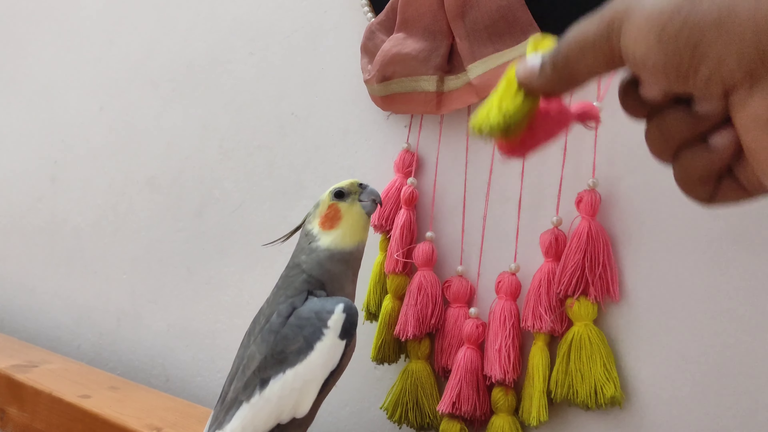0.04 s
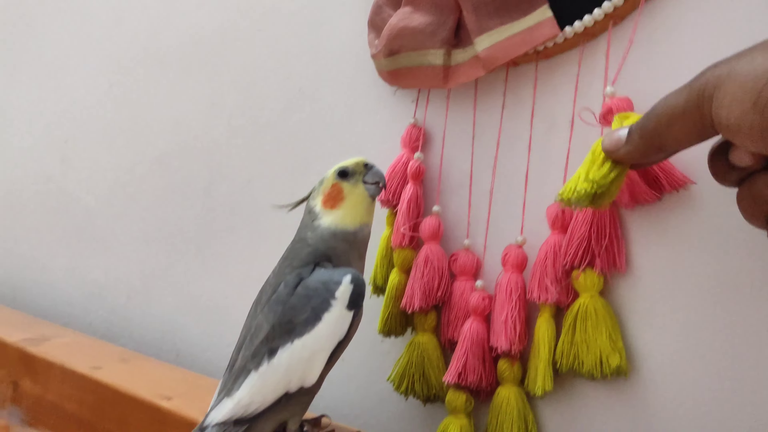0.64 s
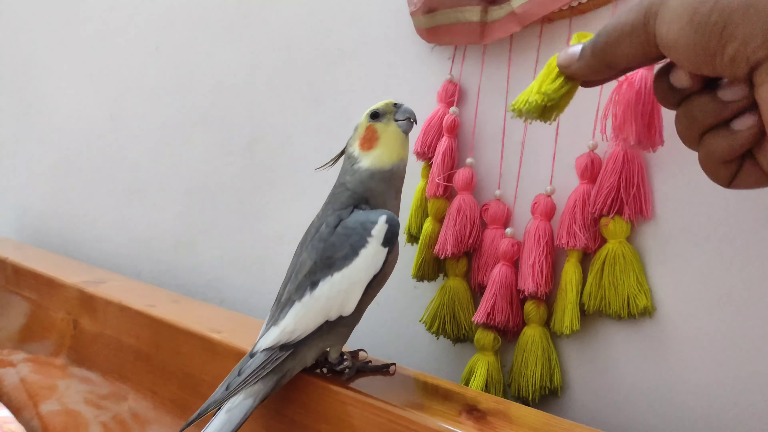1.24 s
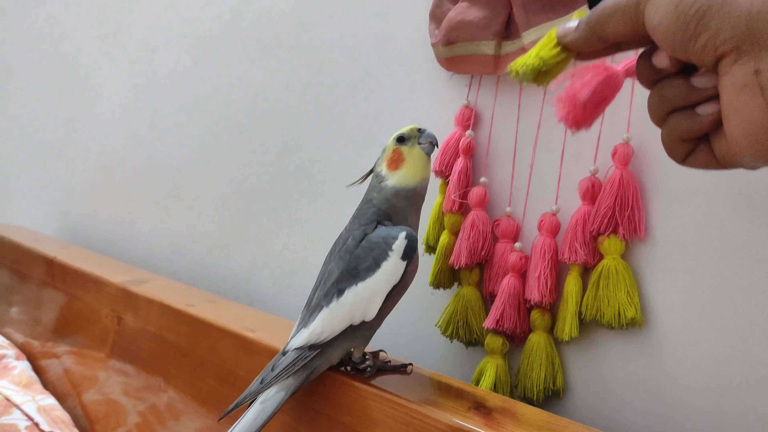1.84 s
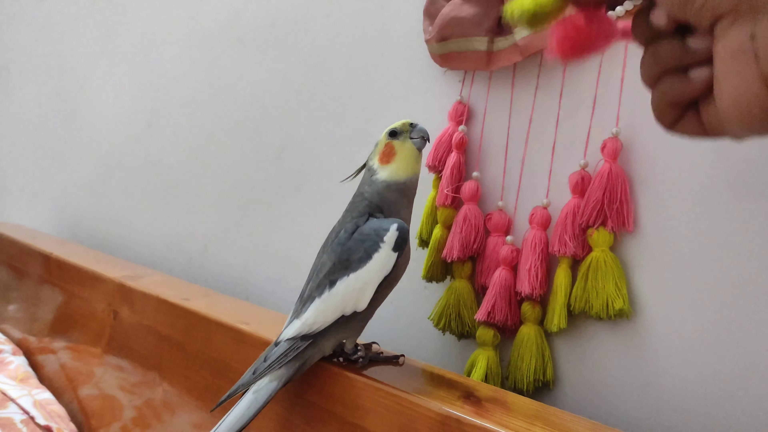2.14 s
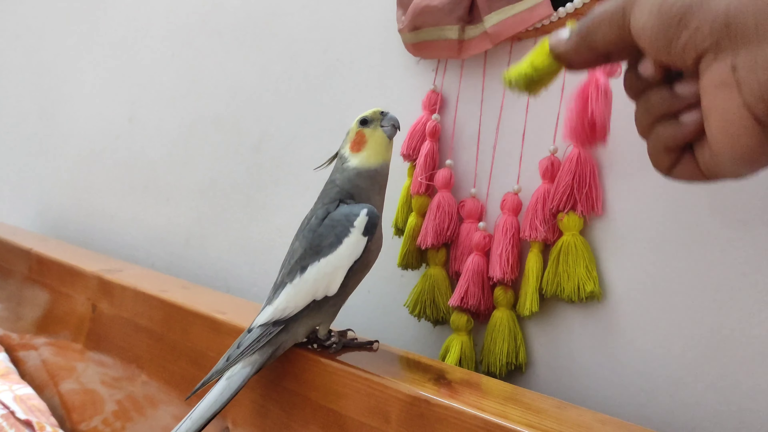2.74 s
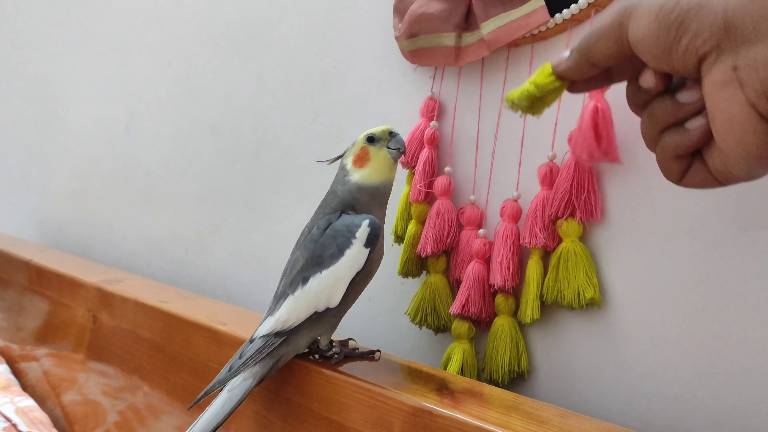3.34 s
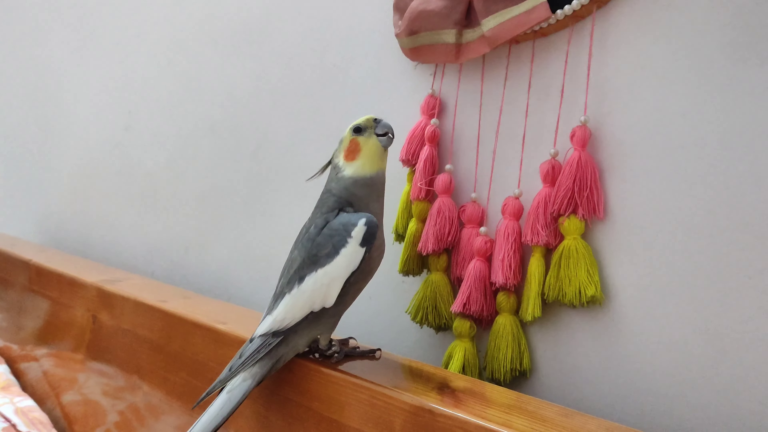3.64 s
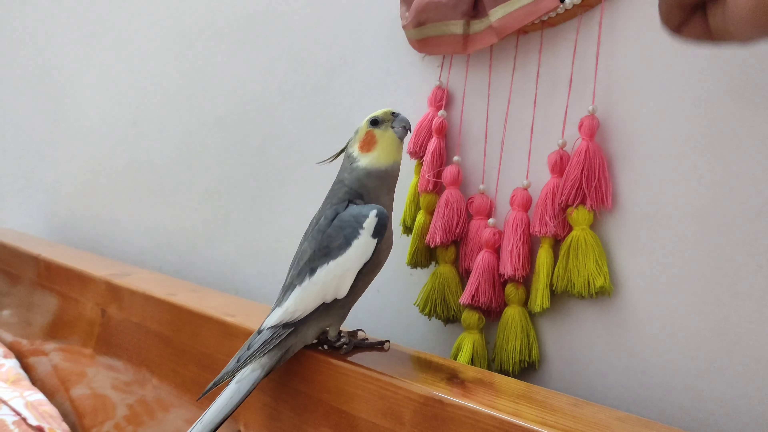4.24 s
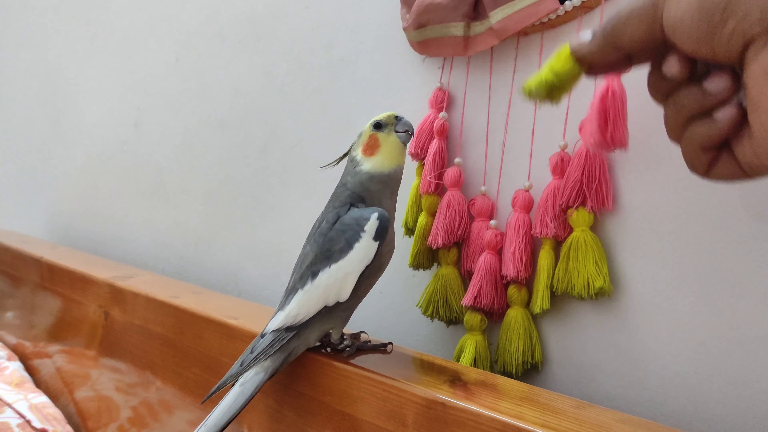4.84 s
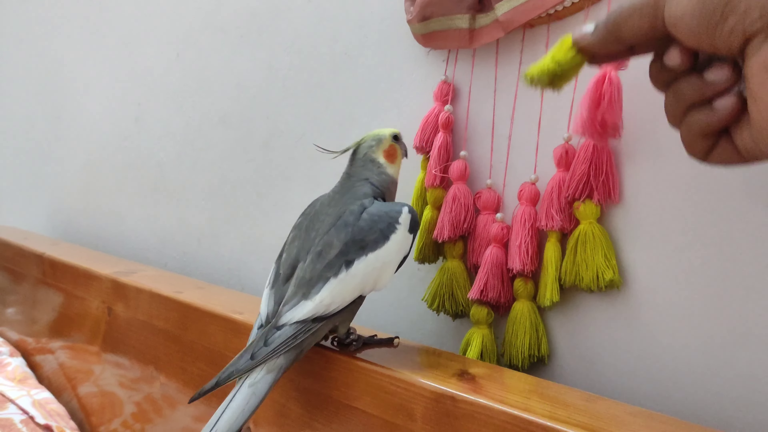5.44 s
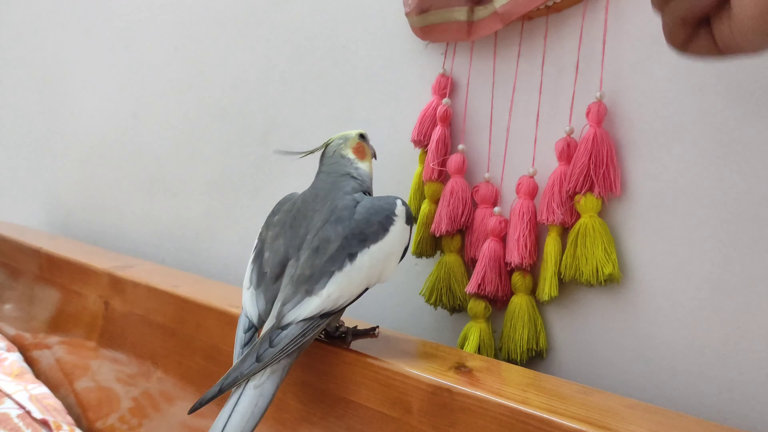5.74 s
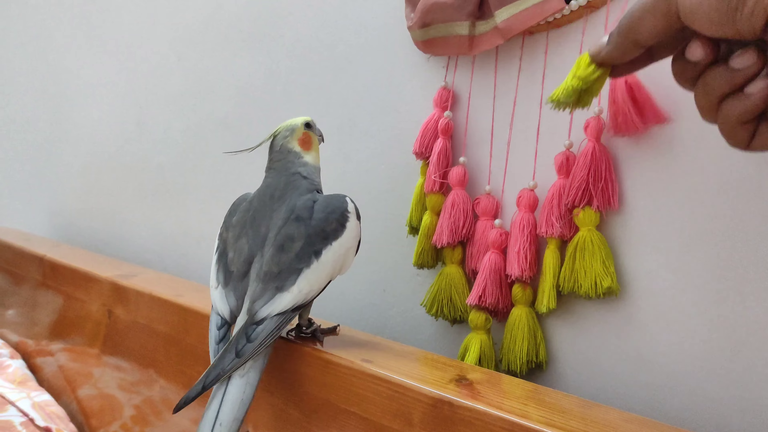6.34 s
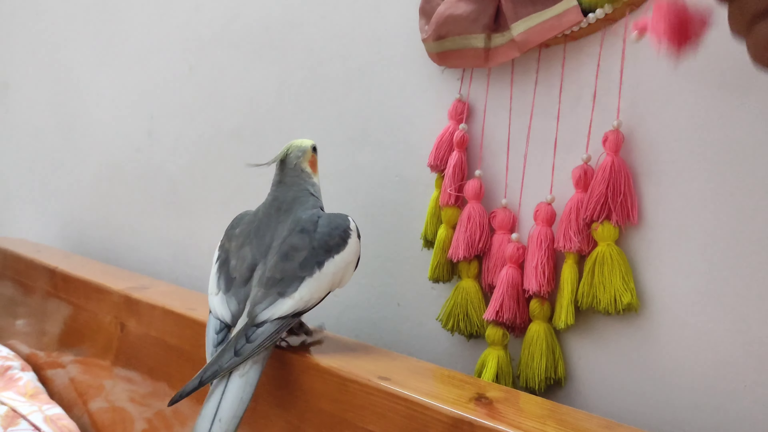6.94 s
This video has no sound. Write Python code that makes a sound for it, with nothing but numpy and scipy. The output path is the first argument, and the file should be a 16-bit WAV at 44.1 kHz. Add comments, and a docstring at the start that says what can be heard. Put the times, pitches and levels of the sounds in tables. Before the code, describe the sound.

A cockatiel sings close by in a small room, with whistles, quick chirps, warbled glides and a repeated nasal tune.

```python
"""A cockatiel sings close by in a small room while a hand jiggles the tassels of a wall hanging.
Its voice box opens with two whistles, a cluck and a warbled arch, then six quick chirps follow.
Midway a nasal tune comes four times, with one dull bump on wood as it starts. Two clucks, each with a
warbled glide, lead to the last chirps and rasps. All along, the room rumbles and rings softly,
with a thin hiss and a few faint ticks."""
import sys
import numpy as np
from scipy import signal
from scipy.fft import rfft, irfft
from scipy.io import wavfile

SR = 44100
rng = np.random.default_rng(int(sys.argv[2]) if len(sys.argv) > 2 else 0)


def store_wav(level_fs):
    """Save 16-bit WAV to argv[1]."""
    pcm = np.round(np.clip(np.atleast_2d(level_fs), -1, 1) * 32767)
    wavfile.write(sys.argv[1], SR, pcm.T.astype(np.int16))


N = 317961
TIME = np.arange(N) / SR

# tone colours of the voice: level/dB of harmonics 2 to 5, added to a syllable's overtone level
PURE, HOLLOW = [-1, -8.5, -23, -20], [6.5, 6.5, -9, -32.5]
BRIGHT, REEDY = [-4.5, 9.5, 8, -6.5], [0.5, -14, -25, -27.5]


def cockatiel():
    """The bird strings syllables together; all of them leave through the same throat."""
    # how each syllable is sung: settings for syllable(); triples give the onset, hold and end values
    syllables = { "rise": dict(colour=PURE, attack_s=.036, hold_s=.02, level_db=(-41.5, -22.5, -36),
                 overtones_db=(-17.5, -18.5, -19), rasp=(.07, .05, 0.089)),
                 "whistle": dict(colour=HOLLOW, attack_s=.062, hold_s=.011, level_db=(-40.5, -16.5, -30),
                 overtones_db=(-34, -34.5, -27), rasp=(.06, .012, .005), swell=1.2),
                 "cluck": dict(colour=BRIGHT, attack_s=0.011, hold_s=.004, level_db=(-35, -36, -40),
                 overtones_db=(15, 0, -0.5), rasp=(0.047, 0.052, 1)),
                 "arch": dict(colour=PURE, attack_s=.064, hold_s=0.033, level_db=(-36, -17.5, -31.5),
                 overtones_db=(-32, -25, -15.5),
                 warble=.049, falter_s=.105, falter_db=-12.5, break_s=0.14, rasp=(.1, .035, .45)),
                 "slow arch": dict(colour=PURE, attack_s=0.078, hold_s=.028, level_db=(-41.5, -21, -32),
                 overtones_db=(-19, -22, -12),
                 warble=.055, swell=1.6, falter_s=.076, falter_db=-13.5, break_s=.145, rasp=(.12, .045, .5)),
                 "slur": dict(colour=PURE, attack_s=0.069, hold_s=0.018, level_db=(-44, -27, -31.5),
                 overtones_db=(-29, -8.5, -33), rasp=(.1, 0.013, .01), warble=0.044),
                 "chip": dict(colour=PURE, attack_s=0.025, hold_s=.011, level_db=(-44.5, -23, -36),
                 overtones_db=(-7, -25.5, -28), rasp=(.6, 0.071, 0.085), swell=1.5),
                 "slide": dict(colour=PURE, attack_s=.01, hold_s=0.01, level_db=(-37, -51.5, -37.5),
                 overtones_db=(-29.5, -36.5, -26), rasp=(.1, .2, .6)),
                 "squeak": dict(colour=PURE, attack_s=.004, hold_s=.004, level_db=(-44.5, -39, -45.5),
                 overtones_db=(-36, -31.5, -21.5), rasp=(.1, .15, .9)),
                 "flick": dict(colour=PURE, attack_s=0.0045, hold_s=.009, level_db=(-48.5, -31.5, -49.5),
                 overtones_db=(-18.5, -18, -18), rasp=(.6, .3, 0.94), swell=2),
                 "nasal": dict(colour=REEDY, attack_s=.04, hold_s=0.002, level_db=(-56.5, -33, -41.5),
                 overtones_db=(19.5, 4.5, -27), rasp=(0.11, 0.015, .04)),
                 "blip": dict(colour=PURE, attack_s=0.015, hold_s=0.0021, level_db=(-52.5, -33.5, -34),
                 overtones_db=(-14, -21.5, -33), rasp=(1, 0.4, .2), swell=2),
                 "fall": dict(colour=PURE, attack_s=0.014, hold_s=0.015, level_db=(-50, -33.5, -40),
                 overtones_db=(-41, -22, -14.5), rasp=(0.91, 0.1, 1), warble=0.019),
                 "hoot": dict(colour=PURE, attack_s=.005, hold_s=0.0072, level_db=(-35, -33, -47.5),
                 overtones_db=(-13.5, -25, -13), rasp=(.3, .03, .15)),
                 "rasp": dict(colour=PURE, attack_s=0.033, hold_s=.004, level_db=(-41.5, -31.5, -49),
                 overtones_db=(-22.5, -46.5, -15.5), rasp=(.55, .9, 1), warble=.12)}
    # the path of each syllable's pitch: t/s from its start, f/Hz
    glides = { "rise": [(0, 2150), (.014, 2275), (.026, 2620), (.042, 2930), (.066, 3150), (.08, 3090)],
              "whistle": [(0, 2250), (.035, 2360), (.054, 2314), (.066, 2220), (.094, 2210)],
              "cluck": [(0, 1485), (.009, 1499), (.016, 1571), (.034, 1518)], "arch": [(0, 1560),
              (.02, 2046), (.048, 2183), (.064, 2882), (.084, 2973), (.104, 3256), (.118, 2720),
              (.127, 1932), (.172, 1561)], "slow arch": [(0, 1354), (.035, 1940), (.073, 2040),
              (.085, 2790), (.115, 3114), (.14, 2780), (.158, 1870), (.175, 1632), (.208, 1706)],
              "slur": [(0, 1225), (.026, 1920), (.04, 2015), (.07, 1915), (.095, 2005), (.127, 1935)],
              "chip": [(0, 1261), (.016, 1460), (.026, 2487), (.036, 2714), (.046, 2756), (.062, 2638)],
              "slide": [(0, 4200), (.014, 3610), (.024, 2746), (.031, 2250), (.04, 1930)],
              "squeak": [(0, 4600), (.011, 4425), (.02, 3500)], "flick": [(0, 3510), (.005, 2562),
              (.027, 1950)], "nasal": [(0, 1262), (.013, 1277), (.026, 1332), (.043, 1425), (.062, 1406)],
              "blip": [(0, 1565), (.016, 2185), (.023, 2390)], "fall": [(0, 4853), (.004, 4486),
              (.007, 2986), (.011, 2656), (.029, 2171), (.04, 1697), (.054, 1460)], "hoot": [(0, 1450),
              (.008, 1509), (.017, 1396), (.026, 1390)], "rasp": [(0, 1620), (.065, 1796)]}
    # windpipe and beak favour the sound below 3 kHz and weaken it above: f/Hz, level/dB
    throat = [(500, 4), (1400, -3), (2900, 2), (3300, -5), (3700, -6), (4600, -14.5), (5400, -11.5),
              (6200, -5.5), (7400, -8)]
    out = np.zeros(N)
    for s, name, ratio, strength_db in song():
        add(out, s, from_db(strength_db) * syllable(ratio, glides[name], **syllables[name]))
    return coloured(out, throat)


def song():
    """Spell the song out as a list of syllables: t/s, name, pitch ratio, strength/dB."""
    # single notes: t/s, syllable, pitch ratio, strength/dB
    lone_notes = [(.029, "rise", 1, -0.5), (.211, "whistle", 1, -1), (1.758, "rasp", .96, -13),
                  (6.89, "rasp", .84, -10), (7.028, "rasp", 1.39, -1.5)]
    # a cluck, then a warbled glide: t/s, cluck pitch ratio, cluck strength/dB, glide delay/s, glide
    flourishes = [(.568, 1, 1, 0.14, "arch"), (5.201, 1.025, 3, 0.14, "slur"),
                  (5.726, 1.022, 1, 0.13, "slow arch")]
    # a rising chip, then a falling tail: t/s, pitch ratio, strength/dB, delay/s, tail, tail pitch ratio
    chirps = [(.984, .975, 1.5, .105, "soft", 0.92), (1.244, .99, 1.5, 0.11, "soft", 0.9),
              (1.806, 1.045, 7, 0.11, "sharp", 0.91), (2.077, 1.01, 0.5, 0.11, "sharp", 0.91),
              (2.355, 1.015, 1.5, 0.11, "sharp", 0.93), (2.635, 1.01, 0.5, 0.12, "sharp", 0.97),
              (6.16, 1.005, 1.5, .112, "soft", 0.87), (6.426, 1, 0.5, 0.12, "soft", .86),
              (6.942, 1.037, 4.5, 0.11, "sharp", 1.015)]
    # the soft and the sharp tail: delay/s, syllable
    tails = {"soft": [(0.0018, "slide")], "sharp": [(0, "squeak"), (.015, "flick")]}
    # the nasal tune: delay/s, syllable
    tune = [(0, "nasal"), (.097, "blip"), (.171, "fall"), (0.225, "hoot")]
    # it comes four times, slowing a little: t/s, pitch ratio, strength/dB
    tune_repeats = [(3.413, 0.99, -.5), (3.842, 0.99, 0.5), (4.28, 1.003, -.3), (4.731, 1, .8)]
    notes = list(lone_notes)
    for s, ratio, strength_db, delay, glide in flourishes:
        notes += [(s, "cluck", ratio, strength_db), (s + delay, glide, 1, 0)]
    for s, ratio, strength_db, tail_delay, tail, tail_ratio in chirps:
        notes += [(s, "chip", ratio, strength_db)]
        notes += [(s + tail_delay + delay, name, tail_ratio, 0) for delay, name in tails[tail]]
    for s, ratio, strength_db in tune_repeats:
        notes += [(s + delay, name, ratio, strength_db) for delay, name in tune]
    return notes


def syllable(ratio, glide, colour, attack_s, hold_s, level_db, overtones_db, rasp,
             warble=.003, swell=1, falter_s=0, falter_db=0, break_s=None):
    """The voice box (syrinx) vibrates in a tone with overtones, and rasps when it shakes unevenly."""
    warble_hz, shake_hz = 112, 540
    falter_width_s, break_length_s, fade_s = .005, .0088, .0051
    length_s, release_s = glide[-1][0], attack_s + hold_s
    t = np.arange(int(length_s * SR)) / SR
    # three stages: attack, hold, release; a swell above 1 delays the attack, then hurries it
    stage_times = [0, attack_s, release_s, length_s]
    stage = np.where(t < attack_s, attack_s * (t / attack_s) ** swell, t)
    level_db, overtones_db = [np.interp(stage, stage_times, [onset, hold, hold, end])
                              for onset, hold, end in (level_db, overtones_db)]
    # a falter is a brief dip as the voice changes register (its low or high range)
    level_db = level_db + falter_db * np.exp(-((t - falter_s) / falter_width_s) ** 2)
    # the rasp settles during the attack and jumps to its end value on release, or later at break_s
    break_s = break_s or release_s
    onset, hold, end = rasp
    rasp = np.interp(t, [0, attack_s, break_s, break_s + break_length_s], [onset, hold, hold, end])
    # the pitch wanders, trembles and warbles, each by a small share of itself
    unsteady = .008 * flutter(hz=45, size=len(t)) + .0058 * flutter(hz=250, size=len(t))
    warbling = warble * np.sin(2 * np.pi * warble_hz * t)
    hz = np.interp(t, *np.transpose(glide)) * ratio * (1 + warbling + unsteady)
    phase = 2 * np.pi * np.cumsum(hz) / SR
    # when every second cycle differs (period doubling), tones appear halfway between the harmonics
    doubling = .34 * np.cos(phase / 2)
    gains = [1] + [from_db(overtones_db + db) for db in colour]
    tone = 0
    for k, gain in enumerate(gains, 1):
        # uneven cycles smear each harmonic, the higher ones sooner
        shake = (flutter(shake_hz, len(t)) + 1j * flutter(shake_hz, len(t))) / 2
        rough = np.minimum(rasp * k ** .49, 1)
        swing = np.sqrt(1 - rough ** 2) + rough * (shake + doubling)
        harmonic = np.imag(swing * np.exp(1j * k * phase))
        tone = tone + gain * (k * hz < SR / 2) * harmonic
    # the vibration needs a few cycles to start and to stop
    from_edge_s = np.minimum(t, t[-1] - t)
    fade = np.sin(np.pi / 2 * np.clip(from_edge_s / fade_s, 0, 1)) ** 2
    return from_db(level_db) * fade * tone


def bump(start_s=3.497, contact_s=0.0027):
    """A soft blow on wood sets a few low tones ringing briefly."""
    # the wood's own tones: f/Hz, level/dB, time/s to fade by 60 dB
    wood_tones = [(108.8, -33.5, 0.26), (142.3, -17.5, 0.059), (226, -40, 0.12), (304, -30, 0.077),
                  (414, -39.5, 0.1), (860, -14.5, 0.0087)]
    out, t = np.zeros(N), TIME[:SR // 2]
    ring = sum(from_db(db - 60 * t / t60) * np.sin(2 * np.pi * hz * t) for hz, db, t60 in wood_tones)
    add(out, start_s, ring * (1 - np.exp(-t / contact_s)))
    return out


def ticks(fade_s=0.024):
    """Tiny dry contacts make bursts of noise that die at once."""
    # the contacts: t/s, level/dB
    contacts = [(0.502, -57), (2.889, -46), (3.155, -46), (5.718, -36.5), (6.68, -50), (7.122, -38.5)]
    # tone colour of a tick: f/Hz, level/dB
    tick_colour = [(300, -4), (900, 16), (2200, 5), (5000, -15.5), (7400, 2.5)]
    out, t = np.zeros(N), TIME[:SR // 10]
    for s, level_db in contacts:
        add(out, s, noise(tick_colour, len(t)) * from_db(level_db - 60 * t / fade_s))
    return out


def room(sound, build_s=0.0031, fade_s=0.29, tail_db=-7):
    """Sound arrives directly, as a few near echoes, and as a blurred tail that builds and dies away."""
    # echoes from wall and furniture: delay/s, gain
    echoes = [(.0013, 0.12), (.0062, 0.29), (0.0122, 0.28)]
    # tone colour of the tail: f/Hz, level/dB
    tail_colour = [(200, 8.5), (2500, -3), (7000, -3.5)]
    t = TIME[:SR * 3 // 4]
    tail = noise(tail_colour, len(t)) * from_db(-60 * t / fade_s) * (1 - np.exp(-t / build_s))
    response = from_db(tail_db) * tail / np.sqrt(np.sum(tail ** 2))
    response[0] += 1   # the direct sound
    for delay, gain in echoes:
        response[round(delay * SR)] += gain
    return signal.fftconvolve(sound, response)[:N]


def background(rumble_db=-44, hiss_lift_db=2.0):
    """The room rumbles steadily, with a hum near 100 Hz; a thin high hiss swells and fades on top."""
    # tone colour of the rumble: f/Hz, level/dB
    rumble_colour = [(25, -52.5), (45, -17), (62, -7), (80, -18), (100, 3.5), (125, -8.5), (200, -7),
                     (240, -13.5), (480, -26.5), (750, -25.5), (1100, -37.5), (2600, -49), (4500, -62.5),
                     (7500, -61)]
    # the hiss over time, before its lift: t/s, level/dB
    hiss_levels = [(0.0, -84.5), (0.74, -75.5), (1.18, -78), (1.46, -87.5), (1.8, -89), (2.0, -79.5),
                   (3.57, -84), (5.77, -86), (5.9, -79), (6.13, -74.5), (6.28, -82), (6.96, -83),
                   (7.2, -72.5)]
    # tone colour of the hiss: f/Hz, level/dB
    hiss_colour = [(3000, -26.5), (5500, -10.5), (6800, 2), (7500, 8), (7800, -19)]
    hiss_db = np.interp(TIME, *np.transpose(hiss_levels)) + hiss_lift_db
    hiss = from_db(hiss_db) * noise(hiss_colour, N)
    return from_db(rumble_db) * noise(rumble_colour, N) + hiss


def from_db(db):
    """Turn decibels into a gain to multiply by."""
    return 10 ** (np.asarray(db) / 20)


def rms_one(x):
    """Scale a signal so that its average size (rms) is 1."""
    return x / np.sqrt(np.mean(x ** 2) + 1e-20)


def add(track, s, sound):
    """Mix a sound into a track, starting at s seconds."""
    start = max(round(s * SR), 0)
    track[start:start + len(sound)] += sound[:N - start]


def coloured(x, colour):
    """Boost or cut each frequency along a curve of points: f/Hz, level/dB."""
    hz, db = np.transpose(colour)
    bin_hz = np.maximum(np.fft.rfftfreq(len(x), 1 / SR), 1)
    gain = from_db(np.interp(np.log(bin_hz), np.log(hz), db))
    return irfft(rfft(x) * gain, len(x))


def noise(colour, size):
    """Noise of average size 1 with the given tone colour."""
    return rms_one(coloured(rng.standard_normal(size), colour))


def flutter(hz, size):
    """A random wobble of average size about 1, mostly slower than hz."""
    lowpass = signal.butter(2, hz, fs=SR, output="sos")
    return rms_one(signal.sosfilt(lowpass, rng.standard_normal(SR // 2)))[-size:]


def scene():
    """The bird and the small knocks ring in the room, over the background."""
    return (room(cockatiel() + ticks() + bump()) + background())[None]


def record(dry):
    """A steep filter removes the highest treble."""
    cutoff_hz = 7700
    return signal.sosfiltfilt(signal.ellip(10, .1, 50, cutoff_hz, fs=SR, output="sos"), dry)


dry = scene()
out = record(dry)
store_wav(out)
```